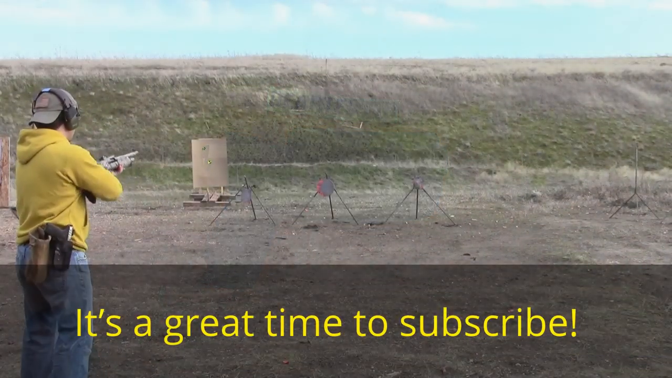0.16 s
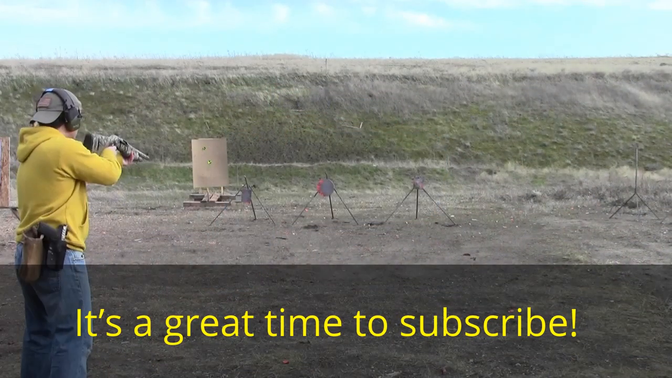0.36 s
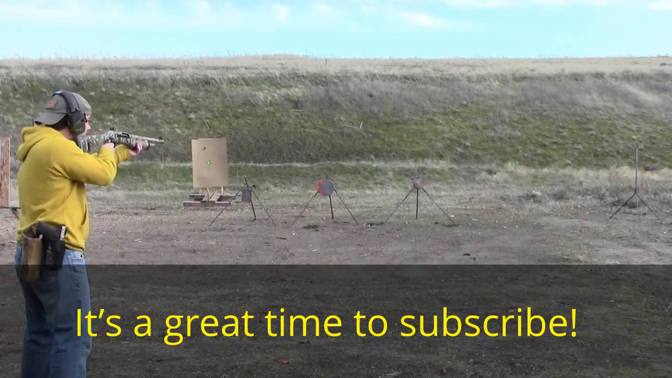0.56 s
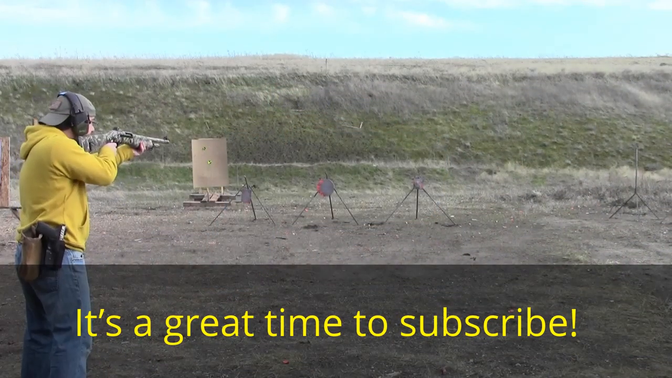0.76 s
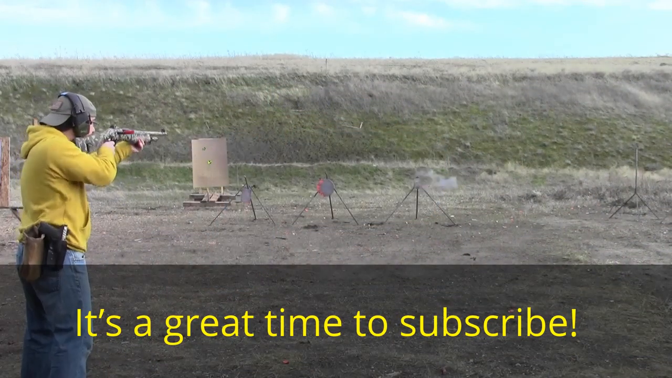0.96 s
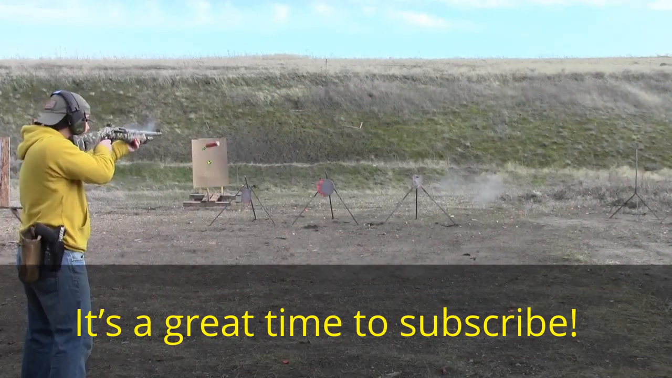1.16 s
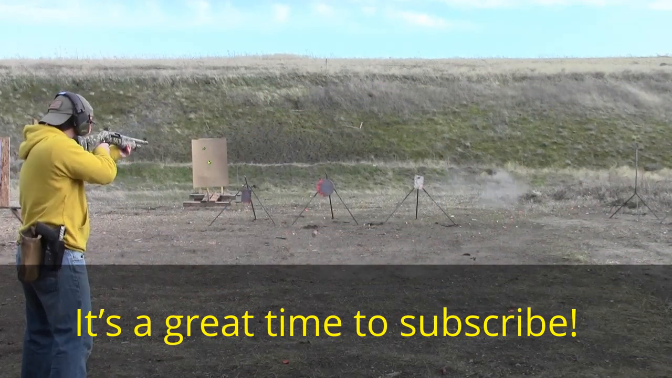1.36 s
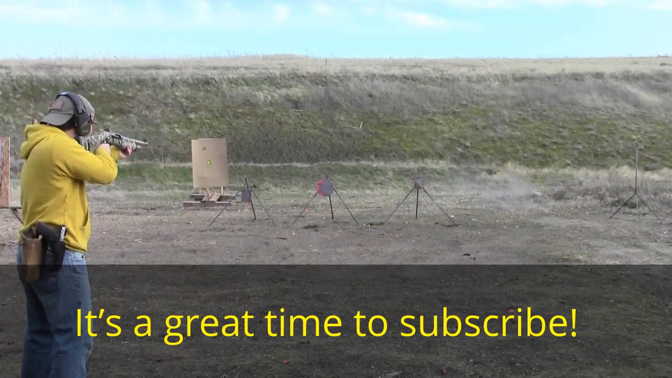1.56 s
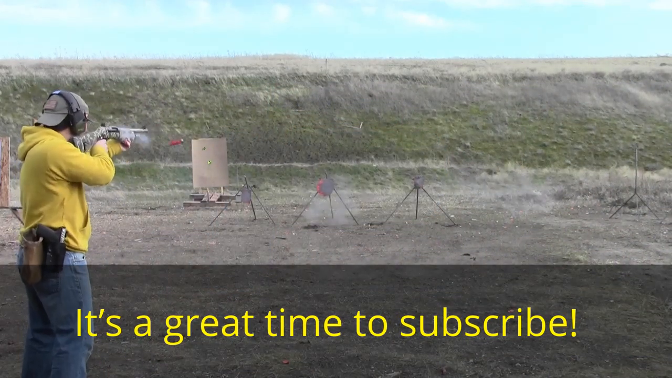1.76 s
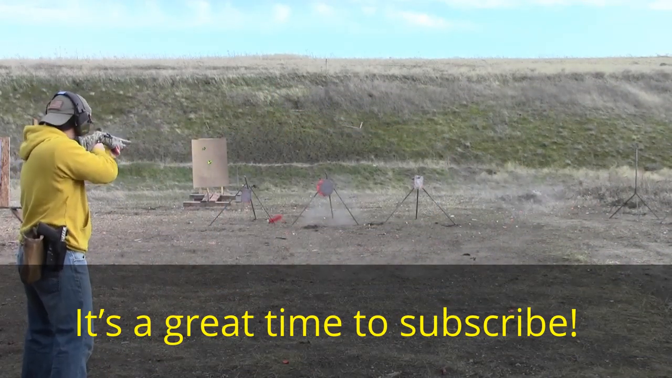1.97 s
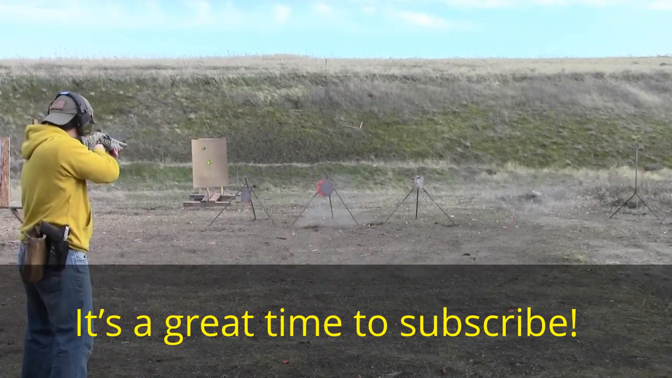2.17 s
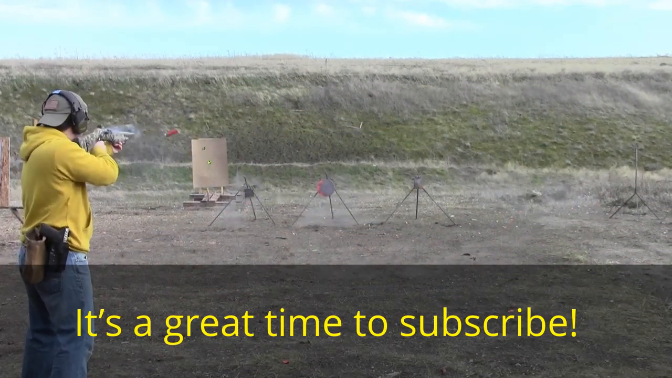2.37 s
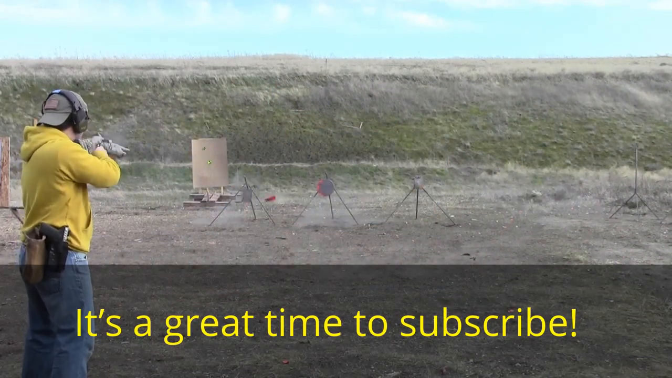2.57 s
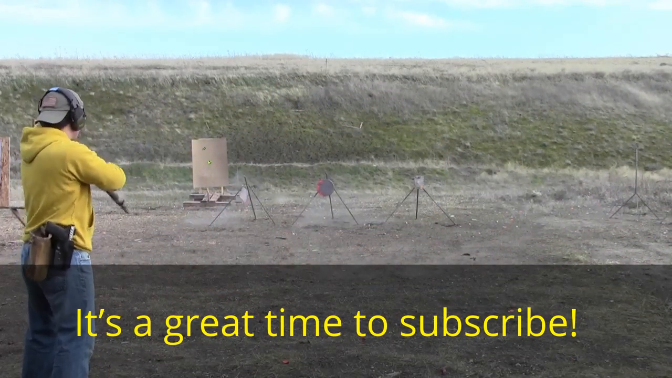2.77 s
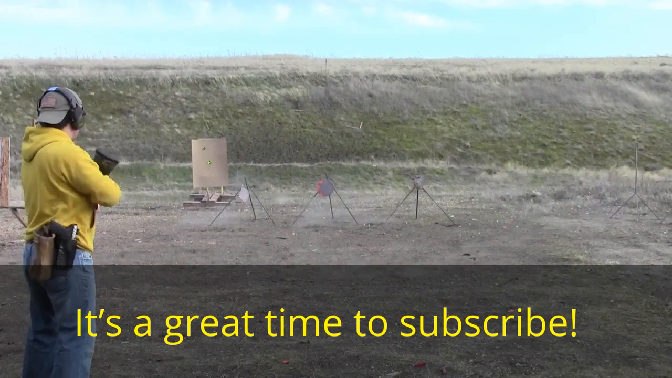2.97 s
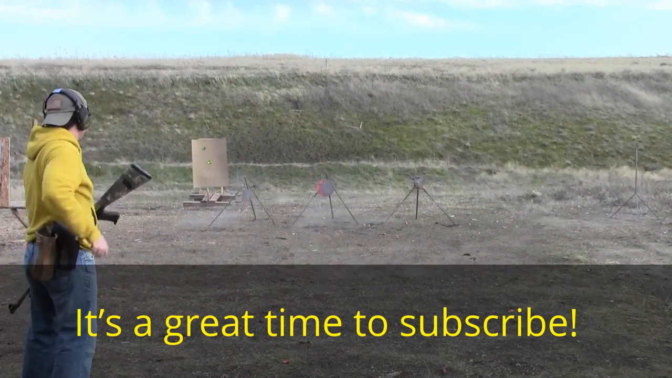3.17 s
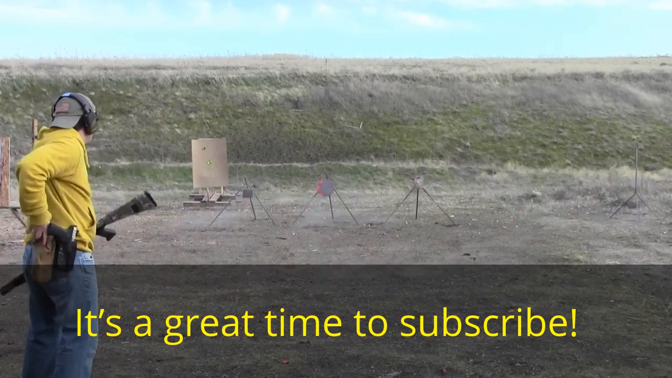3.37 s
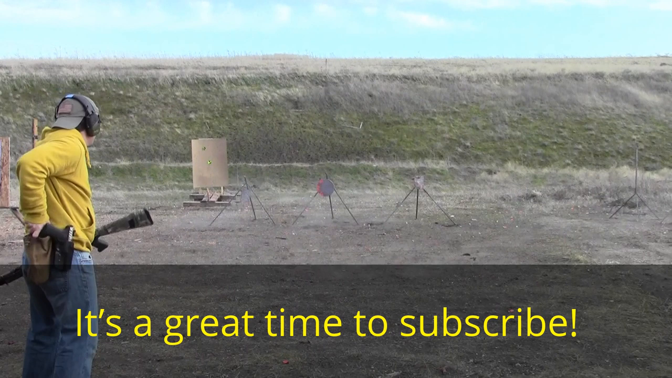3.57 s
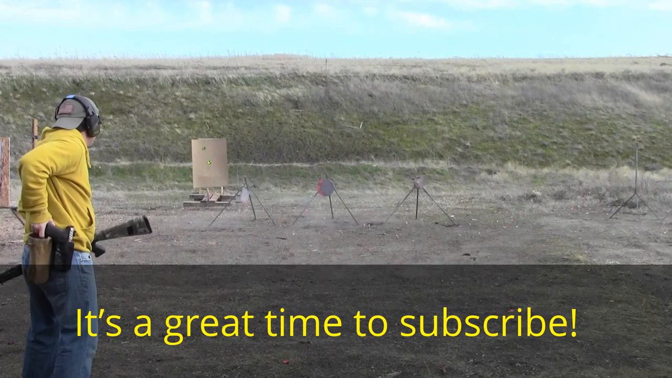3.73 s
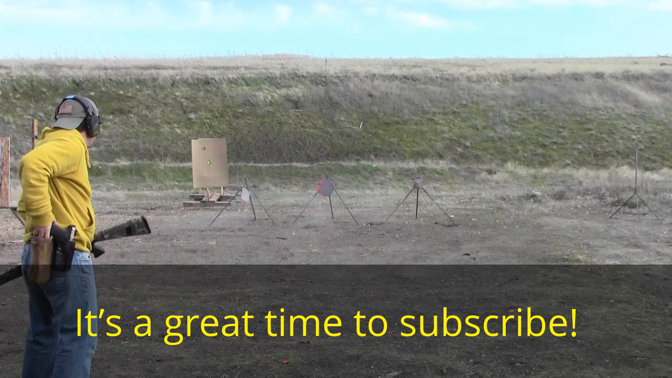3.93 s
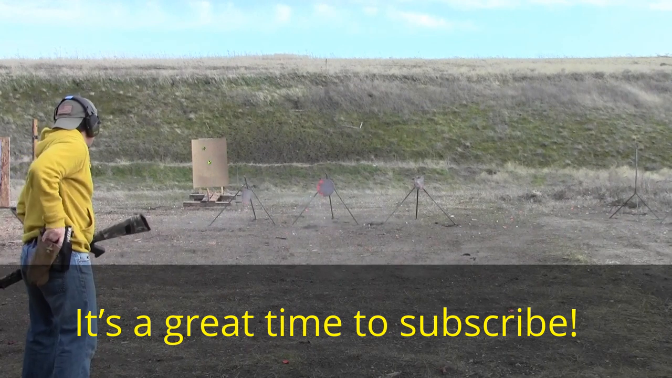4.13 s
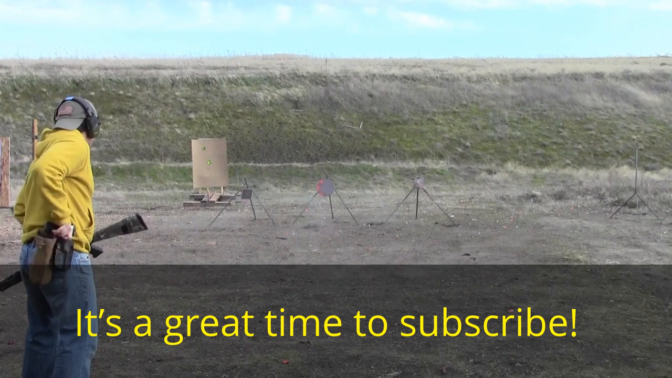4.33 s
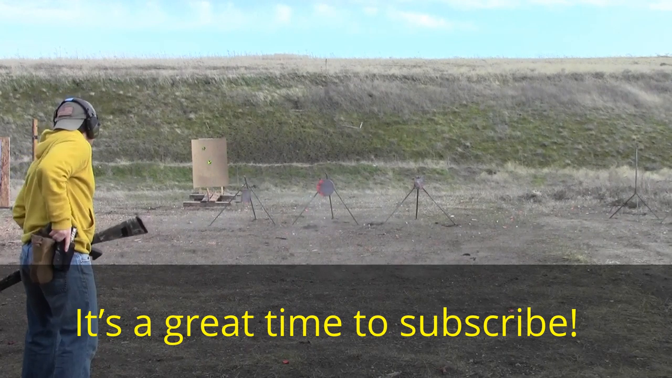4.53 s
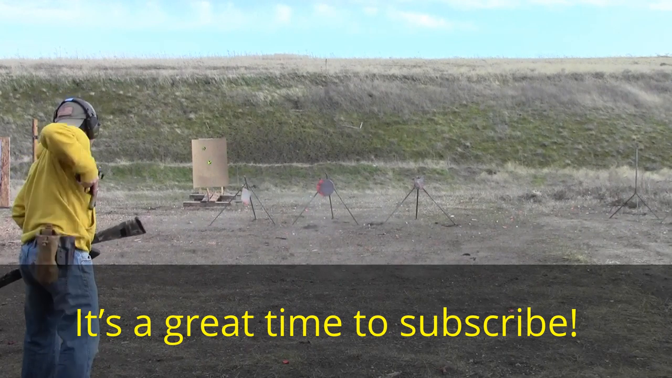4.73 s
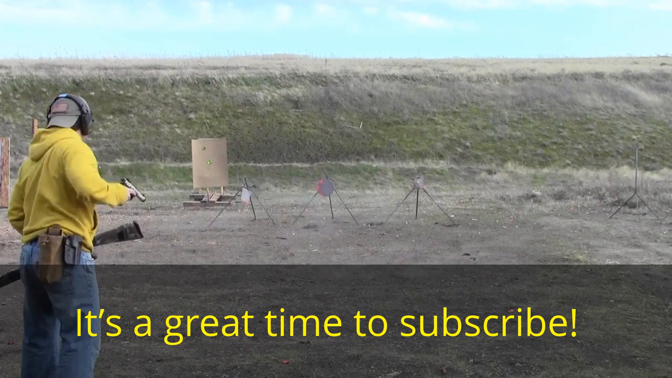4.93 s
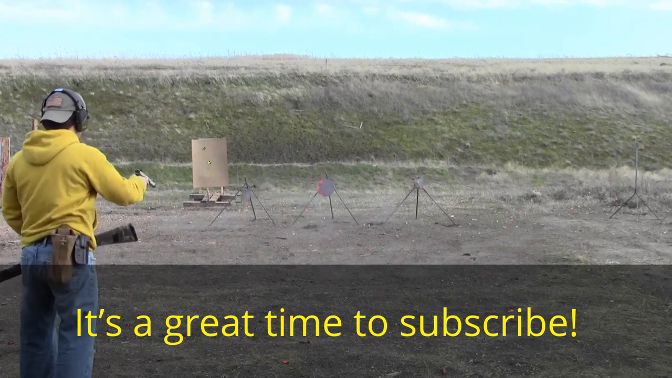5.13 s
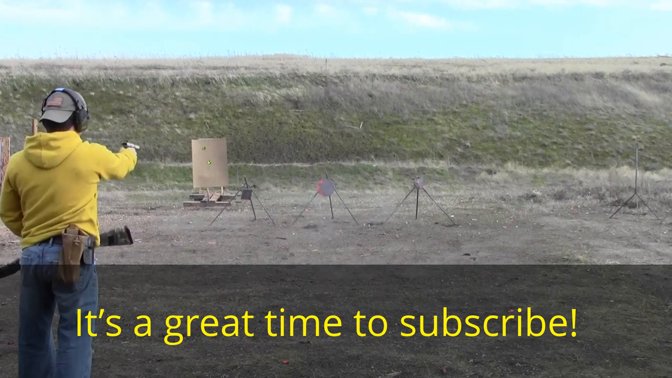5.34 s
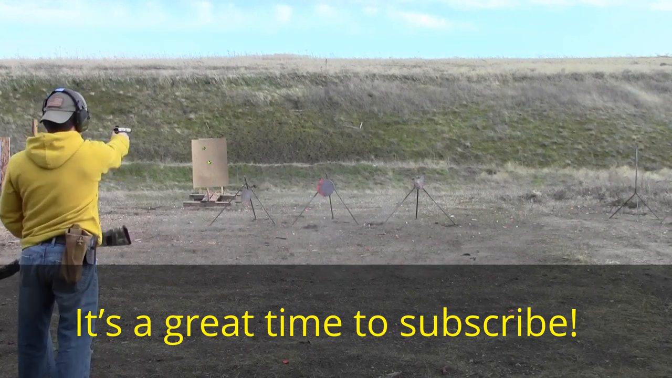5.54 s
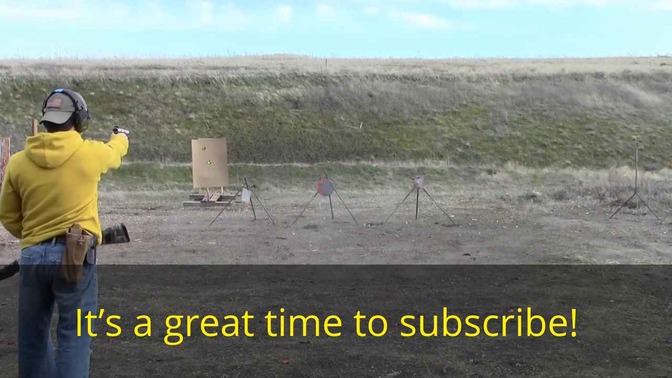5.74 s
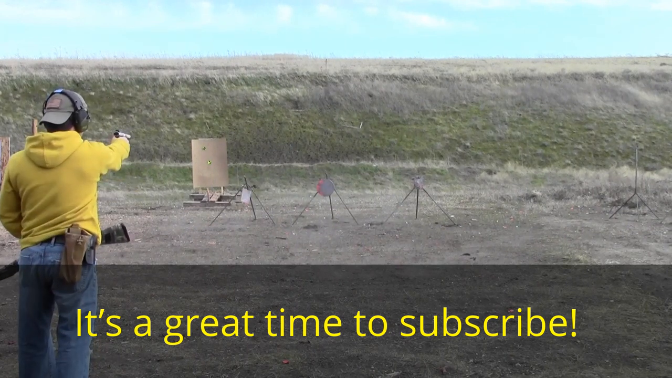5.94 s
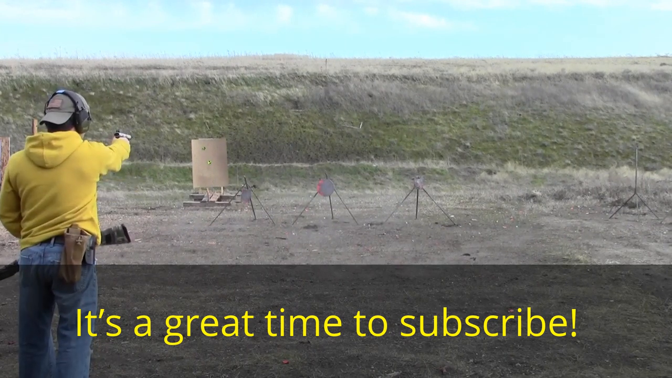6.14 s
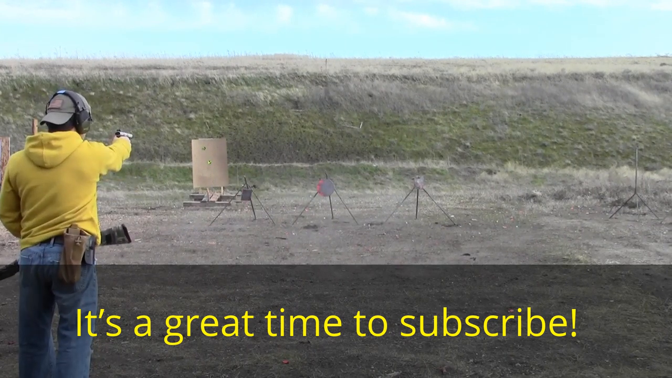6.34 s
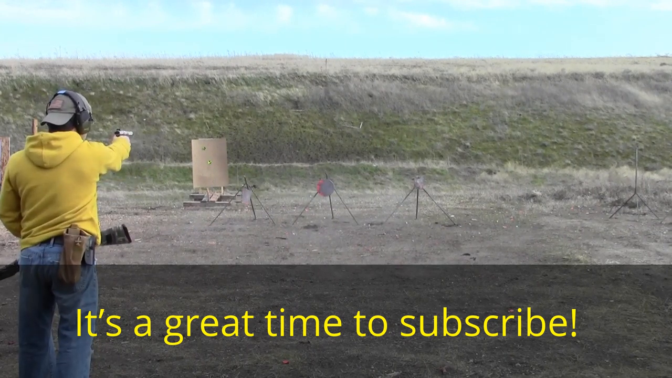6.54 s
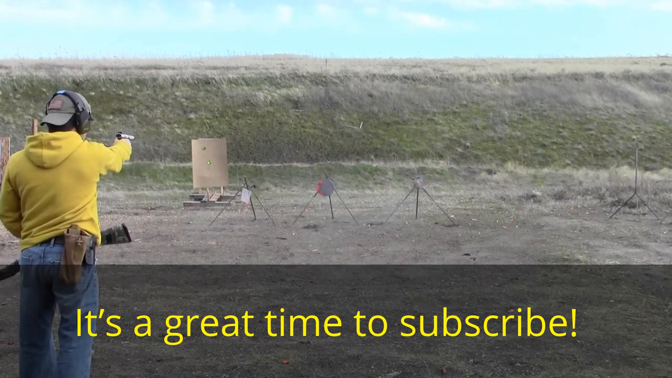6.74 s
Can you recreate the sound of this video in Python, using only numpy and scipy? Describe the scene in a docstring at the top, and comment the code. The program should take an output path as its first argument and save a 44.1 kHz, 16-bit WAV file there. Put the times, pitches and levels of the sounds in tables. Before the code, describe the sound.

Open outdoor range with faint wind and hiss. A few small clicks, then three overloaded shotgun shots with bright steel clangs and noisy returns from the bank; the sound ducks and recovers after each. Metallic clank and clothing rustle follow nearby, then a hollow holster draw, sharp pistol click, a windy pause and a single pistol shot hitting steel.

```python
"""Shotgun and pistol on an open range

Three shotgun blasts ring steel plates and roll back from the earth bank as scattered noise.
The gun is slung with a clank of decaying steel modes; cloth rubs and gear clicks and bumps, all close by.
A pistol is drawn from a stiff holster (knocks through its resonances), clicks, and fires once.
A small camera with two microphone ports clips each blast, ducks its gain and recovers."""
import sys
import numpy as np
from scipy import signal
from scipy.fft import rfft, irfft, next_fast_len
from scipy.io import wavfile
from scipy.ndimage import map_coordinates

SR = 44100
rng = np.random.default_rng(int(sys.argv[2]) if len(sys.argv) > 2 else 0)


def transcribe(u):
    """Save the signal u as a 16-bit wav file named by the first command-line argument.

    u: samples, shape (n,) or (channels, n), limited to [-1, 1]; the rate is SR.
    q: integer samples, one column per channel.
    """
    v = np.clip(np.atleast_2d(u).T, -1, 1)
    q = np.round(v * 32767).astype(np.int16)
    wavfile.write(sys.argv[1], SR, q)


N = 299880

# three shotgun shots, then the pistol; boom and tilt are extras for the returning roll:
# start_s, blast_db, echo_db, boom_db, tilt_db_per_octave, lead_in_crack_db
SHOT_TABLE = [(1.0672, 28.5, -0.5, 0, 0.5, -5), (1.7127, 28, -0.5, 2, 0, -3.5),
              (2.3418, 30, 0.5, -4.5, 0, -4), (6.6304, 28, 12, -24, -0.5, -20.5)]


def amp(db):
    """Decibels to amplitude."""
    return 10 ** (np.asarray(db) / 20)


def unit(x):
    """Scale to an RMS of 1."""
    return x / np.sqrt(np.mean(x ** 2) + 1e-20)


def power_sum(levels_db):
    """Level of unrelated sounds heard together: their powers add."""
    return 10 * np.log10(sum(amp(db) ** 2 for db in levels_db) + 1e-30)


def along(points, hz):
    """Read a curve of (Hz, value) points on a log frequency axis."""
    point_hz, values = np.transpose(points)
    return np.interp(np.log(hz + 1), np.log(point_hz + 1), values)


def wobble(rate, size):
    """A smooth random curve, rate knots a second."""
    knots = rng.standard_normal(int(size * rate / SR) + 4)
    return map_coordinates(knots, [np.arange(size) * rate / SR])


def filtered(x, response):
    """Filter x by a complex response of frequency."""
    size = next_fast_len(x.shape[-1] + 8192)
    spectrum = rfft(x, size) * response(np.fft.rfftfreq(size, 1 / SR))
    return irfft(spectrum, size)[..., :x.shape[-1]]


def shaped(size, gain_db, side_db):
    """Nearly mono noise whose gain is a rule of frequency and time."""
    noise = rng.standard_normal((2, size))
    hz, t, frames = signal.stft(noise, SR, nperseg=256, noverlap=192)
    frames = frames * amp(gain_db(hz[:, None], t))
    mid, side = signal.istft(frames, SR, nperseg=256, noverlap=192)[1][:, :size]
    return np.array([mid + amp(side_db) * side, mid - amp(side_db) * side])


def add(track, s, sound):
    """Mix a sound in at a time in seconds, cut at the end of the track."""
    part = track[..., round(s * SR):round(s * SR) + sound.shape[-1]]
    part += sound[..., :part.shape[-1]]


def burst(t60, hz, width):
    """A dying puff of noise through one broad resonance taken twice, peak near 1; width is per centre."""
    t = np.arange(int(.25 * SR)) / SR

    def resonance(f):
        damping = 1j * f * hz * width
        return (damping / (hz * hz - f * f + damping)) ** 2
    band = filtered(rng.standard_normal(len(t)), resonance)
    return unit(band) * amp(-4.0 - 60 * t / t60)


def air():
    """Light wind and microphone hiss: slowly wavering noise, less alike at the two ports in the lows and mids."""
    # colour of the open air: pitch_hz, relative_db_per_hz
    air_colour = [(12, -27), (20, -4), (168, -14.5), (329, -14), (979, -20.5), (1970, -21.5), (2760, -24),
                  (3000, -23.5), (3360, -26.5), (8690, -30), (16100, -37)]
    # likeness of left and right: pitch_hz, correlation
    likeness = [(60, 0.17), (380, -0.025), (2380, 0.51), (15000, 1)]
    level_db = -57

    def mid_and_side(hz):
        turn = np.arccos(np.clip(along(likeness, hz), -1, 1)) / 2
        return amp(along(air_colour, hz)) * [np.cos(turn), np.sin(turn)]
    mid, side = filtered(rng.standard_normal((2, N)), mid_and_side)
    return amp(level_db + 1.9 * wobble(0.93, size=N)) * unit(np.array([mid + side, mid - side]))


def gusts():
    """Wind buffeting the ports: low noise, different at each, with an irregular level."""
    # course of the wind: time_s, level_db
    gust_course = [(0, -66), (3, -79), (4, -70.5), (5.3, -69), (5.5, -63), (5.75, -62), (5.9, -56),
                   (6.1, -69.5), (6.4, -64), (6.8, -61.5)]
    times, levels_db = np.transpose(gust_course)
    low = filtered(rng.standard_normal((2, N)), lambda hz: 1 / (1 + (hz / 70) ** 2.3))
    ports = unit(low + 0.74 * low[::-1])  # each port shares some of the other's wind
    return amp(np.interp(np.arange(N) / SR, times, levels_db) + 4.4 * wobble(6.4, size=N)) * ports


def rustle():
    """Cloth rubbing: grainy noise, cut below the low mids; each rub swells, fades and dulls off its peak."""
    # rubs of clothing close to the microphone: peak_s, level_db, rise_db_per_s, fall_db_per_s
    rub_table = [(.496, -53.5, 700, 90), (.684, -65, 1200, 1500), (3.02, -52.5, 900, 132),
                 (3.118, -50, 1500, 500), (3.172, -52.5, 260, 153), (3.43, -42.5, 500, 90),
                 (3.524, -40.5, 700, 150), (3.628, -46.5, 600, 45), (3.848, -51.5, 300, 242),
                 (4.116, -51, 100, 82), (4.26, -48, 78, 220), (4.362, -49, 1500, 47),
                 (4.544, -51.5, 1800, 23.5), (4.676, -47.5, 500, 379.5), (4.746, -41.5, 204, 598.5),
                 (4.88, -49, 900, 71), (5.0, -51.5, 503, 300), (5.04, -57, 298, 522)]
    peak_tilt_db, dulling = -1, 0.15  # dB/octave at a peak; dB/octave lost per dB under it

    def colour(hz, t):
        octaves = np.log2(np.maximum(hz, 500) / 7000)
        rubs = []
        for s, db, rise, fall in rub_table:
            under_db = np.where(t < s, rise * (s - t), fall * (t - s))
            tilt_db = peak_tilt_db - dulling * np.minimum(under_db, 20)
            rubs.append(db - under_db + octaves * tilt_db)
        low_cut_db = 25 / (1 + (hz / 350) ** 4)
        top_cut_db = 14 / (1 + (11000 / (hz + 1)) ** 4)
        return power_sum(rubs) - low_cut_db - top_cut_db
    grain = amp(1.4 * wobble(150, size=N))
    return grain * shaped(N, colour, side_db=-19.5)


def clicks():
    """Small clicks: a very short resonant puff of noise, and a faint longer scatter."""
    # action, hulls, sling, buckles and pistol: start_s, level_db, centre_hz, width_per_centre
    click_table = [(0.5781, -37.5, 6980, 2.9), (0.635, -39.5, 2180, 0.63), (0.655, -50, 2400, 1.1),
                   (.7826, -50, 7110, 0.35), (1.1988, -26, 8980, 1.5), (1.8486, -23.5, 9000, 1.5),
                   (2.2237, -24.5, 6860, 0.94), (2.4341, -17, 7200, 1.5), (2.7587, -25, 8800, 0.25),
                   (2.8351, -35.5, 9000, 1), (2.8997, -31, 8000, 2.4), (2.9393, -27.5, 7750, 1.1),
                   (2.9832, -24.5, 6800, 1.7), (2.9903, -32.5, 7470, 1), (3.118, -38.5, 7640, 1.6),
                   (3.184, -35, 3200, 0.94), (3.257, -34.5, 2960, 0.74), (3.3343, -13.5, 5463, 2.6),
                   (3.4013, -26, 5470, 1.4), (3.4591, -33, 2200, 1.4), (3.9088, -38.5, 2404, 1.3),
                   (4.2314, -44, 2850, 1.19), (4.2732, -37.5, 2980, 1.5), (4.361, -38.5, 3320, 0.95),
                   (4.3824, -35, 3300, 0.55), (4.5459, -37, 3990, 2.7), (4.6187, -38.5, 2600, 1.3),
                   (4.6365, -42.5, 2560, 0.91), (4.9654, -30, 4476, 2.2), (4.9902, -41, 7100, 1.17),
                   (5.3067, -14, 3330, 2.5), (5.3776, -33, 4480, 2.7), (5.3993, -39, 1800, 0.76),
                   (5.5081, -47, 2400, 1.2), (5.7553, -35.5, 4980, 3)]
    out = np.zeros(N)
    for s, db, hz, width in click_table:
        click = burst(.015, hz, width)
        scatter = amp(-20) * burst(0.23, min(hz, 3000), 1.4)  # gravel and gear nearby return it
        add(out, s, amp(db) * (click + scatter))
    return out


def clanks():
    """The gun's steel rings: each clank excites the same decaying modes with its own tilt and hardness."""
    # modes of the gun's steel: pitch_hz, relative_db, t60_s
    gun_modes = [(1450, -5, .6), (1999, -2, .33), (2914, -7, .35), (3750, -11, .55), (3914, -13, .6),
                 (4400, -4, .5), (5410, -1, .21), (6191, -8, .3), (7020, -1, .18), (7623, -6, .2),
                 (8936, -13, .24), (10540, -9, .23), (12470, -18, .27), (15180, -18, .17)]
    # clanks close by: start_s, ring_db, tilt_db_per_octave, db_per_doubling_of_t60
    clank_table = [(0.918, -58.5, 4, 12), (3.35, -36, 0.9, -1.5), (3.73, -68.5, 7, 3),
                   (3.84, -56.5, 3.2, 4), (5.55, -65, -1.5, 2.5), (5.99, -63, -2.5, -2),
                   (6.33, -65.5, -3, -5)]
    out, t = np.zeros(N), np.arange(SR) / SR
    for s, db, tilt, soft in clank_table:
        for hz, mode_db, t60 in gun_modes:
            level_db = db + mode_db + tilt * np.log2(hz / 3000) + soft * np.log2(t60 / 0.38)
            level_db += rng.normal(0, 1.4)
            add(out, s, amp(level_db - 60 * t / t60) * np.sin(2 * np.pi * hz * t))
    return out


def blasts():
    """Muzzle blast: a pressure pulse with its undershoot and bursts of noise, then single echoes."""
    # single echoes of the blast: delay_s, relative_db, top_hz
    echo_table = [(.0065, -10, 2504), (0.024, -5, 1770), (.045, -10.5, 1814), (.069, -6, 3000),
                  (.092, -19, 2010), (.362, -35, 2493), (0.531, -50, 1241)]
    # bright slaps off a far hard face: delay_s, level_db
    slap_table = [(.439, -18.5), (.449, -17)]
    out, t = np.zeros(N), np.arange(int(.03 * SR)) / SR
    for s, blast_db, echo_db, _, _, lead_db in SHOT_TABLE:
        u = t / .00045  # time in pulse lengths
        pulse = (1 - u) * np.exp(-u)
        crack = 0.81 * burst(0.019, 6000, 9)[:len(t)]
        body = 0.48 * burst(0.027, 950, 1.0)[:len(t)]
        blast = amp(blast_db) * (pulse + crack + body)
        add(out, s, blast)
        lead_in = burst(0.023, 2000, 2.5)[:len(t)] * (1 - np.exp(-t / 0.0014))
        add(out, s - .004, amp(lead_db) * lead_in)  # arrives before the gain ducks
        for late, db, top_hz in echo_table:
            echo = filtered(blast, lambda f: (1 + 1j * f / top_hz) ** -2.)
            level_db = db + echo_db + rng.normal(0, 0.82)
            add(out, s + late + rng.normal(0, 0.00086), amp(level_db) * echo)
        for late, db in slap_table:
            add(out, s + late, amp(db + rng.normal(0, 0.89)) * burst(.017, 4000, .4))
    return out


def scattered_roll():
    """The blast scattered back: lumpy noise, its colour the power sum of returns from near to far."""
    # ground underfoot, gear nearby, open field, foot and face of the bank, slopes behind, far hills:
    # delay_s, swell_before_it_s, peak_db, fall_db_per_s, boom_db, tilt_db_per_octave
    scatterers = [(0, .001, 30, 1299.5, -3, -1), (0, .001, 27, 188.5, -13.5, -4.5),
                  (.1, .1, 7, 76.5, -15, -8), (.305, .035, -11, 179, 12.5, -3),
                  (.365, .03, -5, 221.5, -3.5, -6), (.45, 0.068, -16, 86.5, 9.5, -5.5),
                  (.7, .2, -43, 22, 15.5, -2)]
    # colour of the range over the whole roll: pitch_hz, gain_db
    field_colour = [(20, -33.5), (55, -13.5), (80, -1), (125, 1.5), (250, 4.5), (500, -2.5), (1500, 0.5),
                    (4000, 2), (5200, -6), (7000, -1.5), (11000, -10), (17000, -23.5)]
    out, size = np.zeros((2, N)), int(1.6 * SR)
    for s, _, echo_db, boom_db, slope, _ in SHOT_TABLE:
        def colour(hz, ago):
            low = 1 / (1 + (hz / 190) ** 4)  # weight of the boom
            octaves = np.log2(np.maximum(hz, 700) / 700)
            returns = []
            for late, swell, db, fall, boom, tilt in scatterers:
                fallen_db = fall * np.maximum(ago - late, 0)
                before_db = 10 * (np.minimum(ago - late, 0) / swell) ** 2
                returns.append(db - fallen_db - before_db + low * boom + octaves * tilt)
            return echo_db + low * boom_db + octaves * slope + power_sum(returns)
        # many separate small reflectors
        lumps_db = 1.4 * wobble(350, size=size) + 1.32 * wobble(60, size=size)
        lumps_db += 2.1 * np.maximum(wobble(220, size=size) - 1.3, 0)
        roll = amp(lumps_db) * shaped(size, colour, side_db=-20.0)
        add(out, s + .0015, filtered(roll, lambda hz: amp(along(field_colour, hz))))
    return out


def plates():
    """Pellets crack on the steel; twin modes beat as it rings, until it swings against its stand."""
    # pellets on steel, and later clangs as a plate rocks: start_s, crack_db, free_ring_s
    hit_table = [(1.119, 34, .6), (1.289, -23.5, 0.4), (1.7645, 36, 1.08), (2.3945, 33.5, 2.5),
                 (2.575, -19, .4), (6.698, 31, .4)]
    # modes heard after each hit, one row a hit: pitch_hz of each mode
    mode_pitches = [
        [7553, 9523, 1500, 14400],
        [2836],
        [3091, 4920, 8218, 8936, 11745, 13078, 1378],
        [1454, 673, 1378, 1755, 2003, 3779, 4334],
        [2918],
        [3250, 7200],
    ]
    # how those modes ring, one row a hit; for each mode: level_db, t60_s, twin_above_hz, twin_share
    mode_rings = [
        [(-26, .6, 4.5, 0.51), (-23, .6, 1.4, -0.63), (-30.5, 2.1, .9, -0.85), (-37.5, 0.45, 1.5, 0.1)],
        [(-22, 1.3, 2.5, -0.42)],
        [(-16, 1.5, 1.2, -0.44), (-32, 2.3, 6.8, -.1), (-18, 0.72, 1.6, -.5), (-26.5, 1, 2.4, -.5),
         (-17, 1.1, 2.9, -.8), (-27, .75, 2.9, -.7), (-26.5, 1.4, 1.6, 0.1)],
        [(-18.5, 2.11, 1.65, -0.16), (-33.5, 2.62, 0.58, -0.32), (-35, 3.2, 0.7, 0.153),
         (-33.5, 2.66, 0.58, -0.24), (-14, 0.7, 2.1, -0.59), (-9.5, .3, 1.5, 0.3), (-20, 0.84, 1.9, -0.13)],
        [(-19, 0.48, 3.2, -1.35)],
        [(-28, 0.6, 1.5, 0.1), (-43, .05, 1.5, 0.1)],
    ]
    out, t = np.zeros(N), np.arange(int(2.5 * SR)) / SR
    for (s, db, free), pitches, rings in zip(hit_table, mode_pitches, mode_rings):
        crack_rise = (1 - np.exp(-t[:SR // 4] / 0.0034)) ** 2
        add(out, s, amp(db) * burst(0.015, 8000, 0.9) * crack_rise)
        damping_db = -300 * np.maximum(t - free, 0)
        for hz, (level_db, t60, twin_hz, share) in zip(pitches, rings):
            mode = np.sin(2 * np.pi * hz * t)
            twin = share * np.sin(2 * np.pi * (hz + twin_hz) * t)
            add(out, s, amp(level_db - 60 * t / t60 + damping_db) * (mode + twin))
    return out


def bumps():
    """Dull knocks of stock and gear against the body: short puffs of low-mid noise."""
    # bumps close by: start_s, level_db
    bump_table = [(2.9822, -38), (3.257, -40), (3.3339, -33.5), (3.4012, -33.5), (3.4591, -31),
                  (3.783, -39), (3.9085, -44), (4.2316, -40.5), (4.2728, -46), (4.361, -42.5),
                  (4.5459, -39), (4.6363, -36.5), (5.036, -43.5)]
    out = np.zeros(N)
    for s, db in bump_table:
        add(out, s, amp(db) * burst(0.05, 660, 1.4))
    return out


def holster_draw():
    """The draw: soft-edged knocks drive the resonances of the stiff holster; treble and thud go past it."""
    # knocks of the draw: start_s, knock_db, treble_relative_db, centre_hz
    knock_table = [(4.757, -20.5, -20, 2530), (4.788, -16, -12, 2480), (4.799, -12.5, -13.5, 2280),
                   (4.811, -9, -11.5, 1586), (4.817, -4, -10, 1498), (4.824, -1, -9.5, 1604),
                   (4.831, -5, -16, 1363), (4.838, -12.5, -15, 1490), (4.847, -13, -18, 3500)]
    # resonances of the holster shell: pitch_hz, width_hz, gain_db
    shell_modes = [(710, 140, -3.5), (1517, 120, -2), (2400, 1000, -12), (3700, 890, -9.5),
                   (4855, 210, -10)]
    blow_db, rub_db = 17, -10.5  # shell drive over each knock: blow, lingering rub
    thud_db = -30.5  # relative to each knock
    into_shell, out = np.zeros(N), np.zeros(N)
    soft = 1 - np.exp(-np.arange(SR // 4) / SR / 0.0025)  # 2.5 ms attack
    for s, db, treble_db, hz in knock_table:
        blow = amp(db + blow_db) * soft * burst(.022, hz, 1.0)
        rub = amp(db + rub_db) * burst(.4, 1150, 2.1)
        add(into_shell, s, blow + rub)
        treble = amp(db + treble_db) * burst(0.06, 7000, 0.9)
        thud = amp(db + thud_db) * burst(0.101, 420, .9)
        add(out, s, soft * (treble + thud))

    def shell(f):
        total = 0
        for k, (centre, width, db) in enumerate(shell_modes):
            damping = 1j * f * width
            total = total + (-1) ** k * amp(db) * damping / (centre * centre - f * f + damping)
        return total
    return out + filtered(into_shell, shell)


def holster_pings():
    """The holster rings: noise through one narrow resonance."""
    # pings close by: start_s, level_db
    ping_table = [(4.9653, -34)]
    out = np.zeros(N)
    for s, db in ping_table:
        add(out, s, amp(db) * burst(0.16, 4830, .18))
    return out


def wide(x):
    """The two ports hear slightly different near reflections, mostly in the treble."""
    scatter = burst(.012, 9000, 2.5)
    side = amp(-16.5) * signal.fftconvolve(x, scatter / np.linalg.norm(scatter))[:N]
    return np.array([x + side, x - side])


def scene():
    """Everything that reaches the two ports."""
    gear = clicks() + clanks() + bumps() + holster_draw() + holster_pings()
    near = wide(gear + blasts() + plates())
    return air() + gusts() + rustle() + near + scattered_roll()


def record(dry):
    """The capsule fades at both ends; gain ducks over a threshold and climbs back; the first instants clip."""
    threshold_db, recovery_db_per_s, top_hz = -2.0, 100, 16200
    span = int(0.001 * SR)
    power = np.convolve(np.mean(dry ** 2, 0), np.ones(span) / span)[:N]
    climb_db = recovery_db_per_s * np.arange(N) / SR
    # a running maximum against the climb: instant duck, steady recovery
    held_db = np.maximum.accumulate(10 * np.log10(power + 1e-12) + climb_db) - climb_db
    capsule = filtered(dry, lambda hz: 1j * hz / (22 + 1j * hz) / (1 + (hz / 15500) ** 6))
    ducked = capsule * amp(-np.maximum(held_db - threshold_db, 0))
    clipped = ducked / (1 + np.abs(ducked) ** 8) ** (1 / 8)
    return np.clip(filtered(clipped, lambda hz: hz < top_hz), -1, 1)


dry = scene()
out = record(dry)
transcribe(out)
```